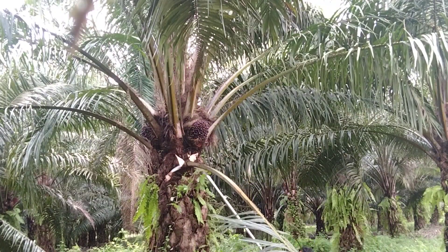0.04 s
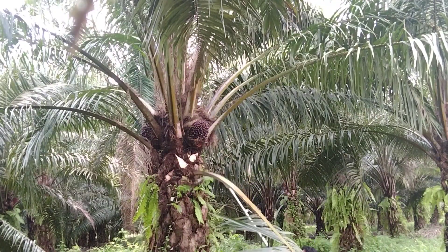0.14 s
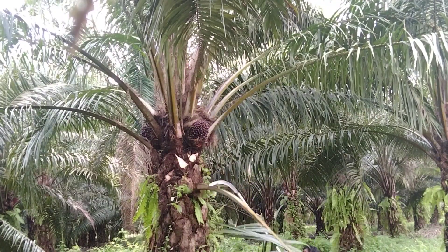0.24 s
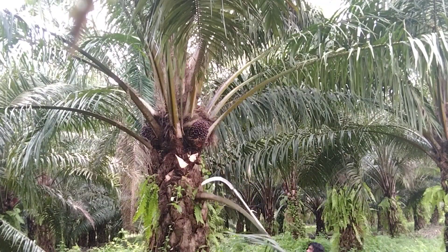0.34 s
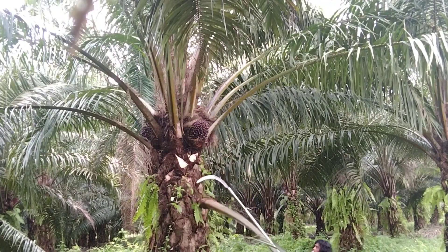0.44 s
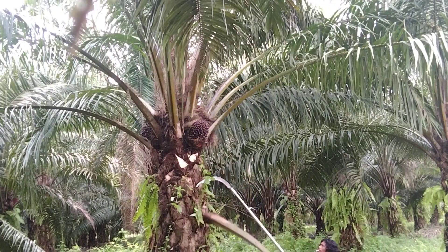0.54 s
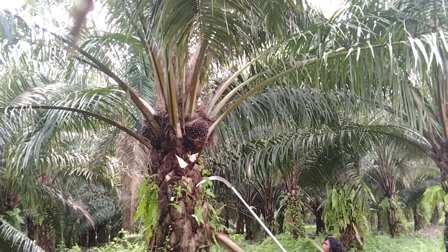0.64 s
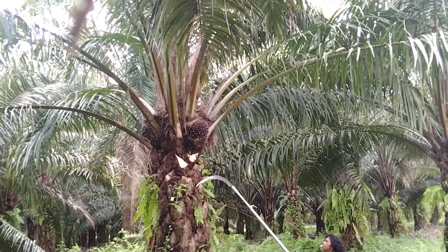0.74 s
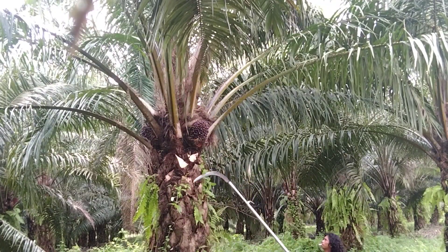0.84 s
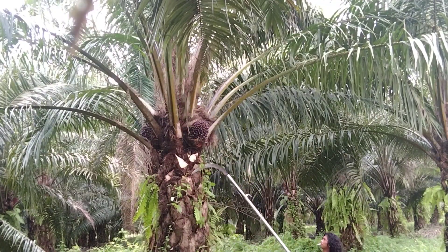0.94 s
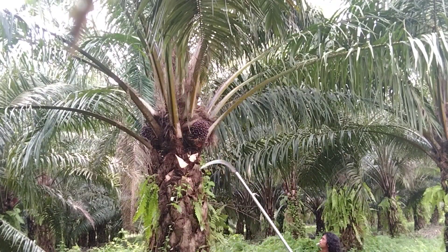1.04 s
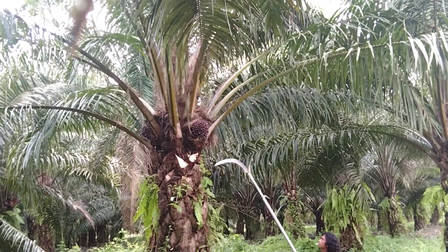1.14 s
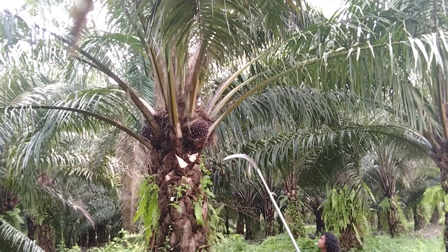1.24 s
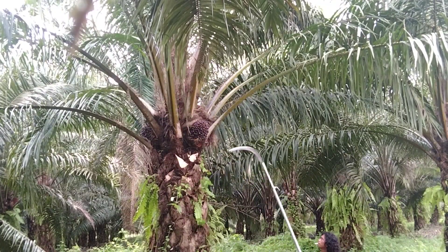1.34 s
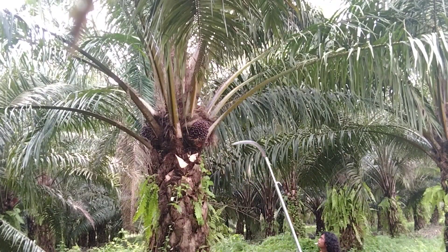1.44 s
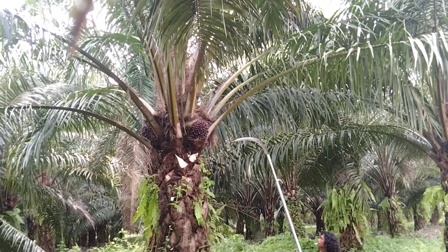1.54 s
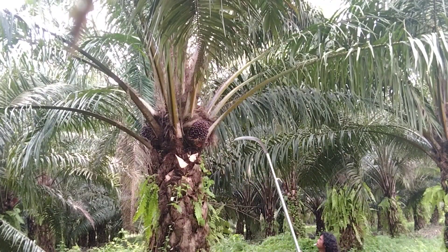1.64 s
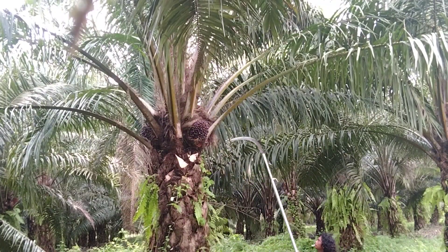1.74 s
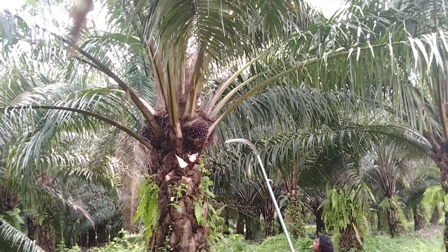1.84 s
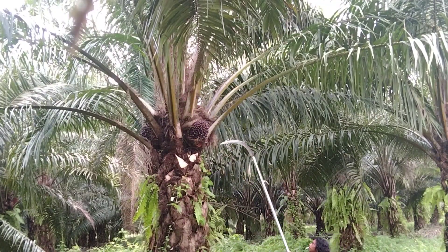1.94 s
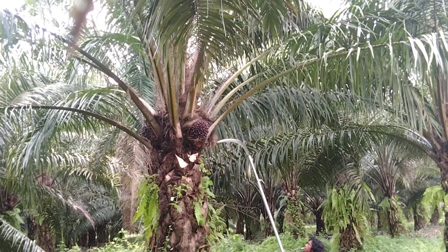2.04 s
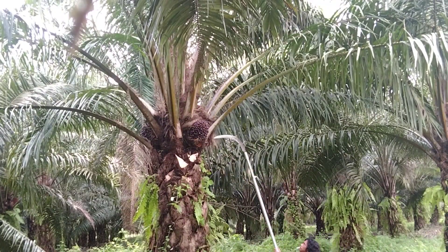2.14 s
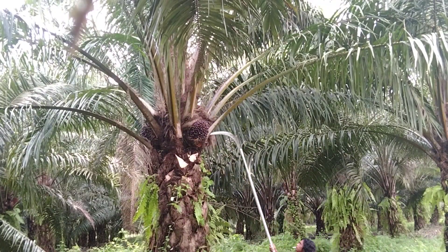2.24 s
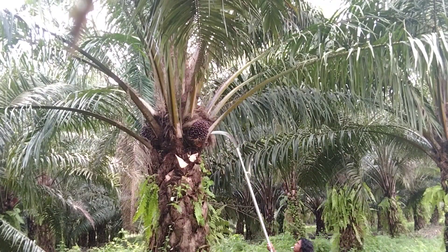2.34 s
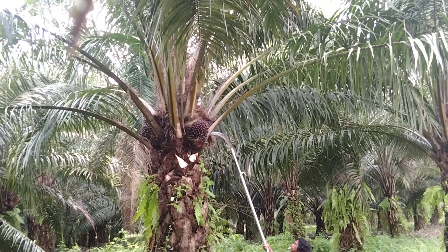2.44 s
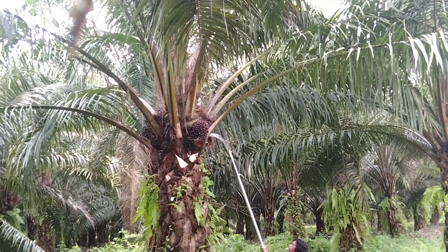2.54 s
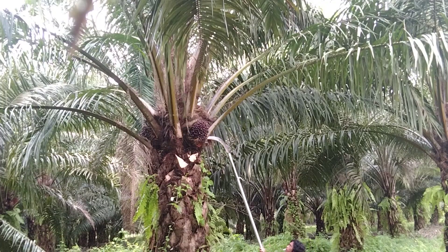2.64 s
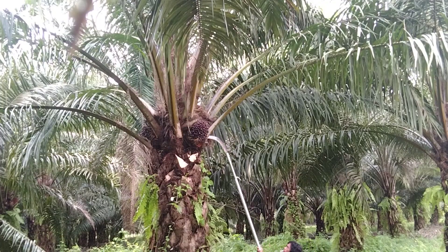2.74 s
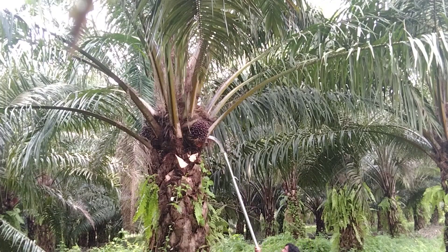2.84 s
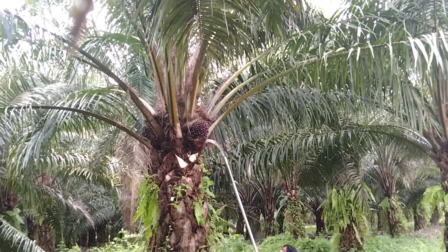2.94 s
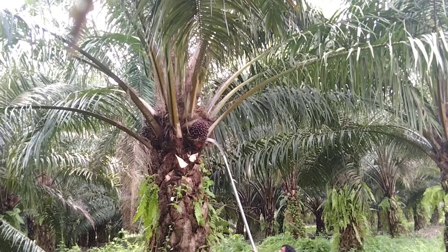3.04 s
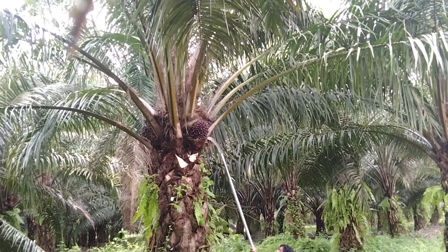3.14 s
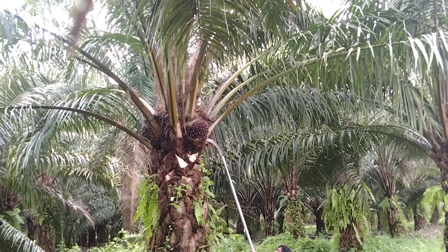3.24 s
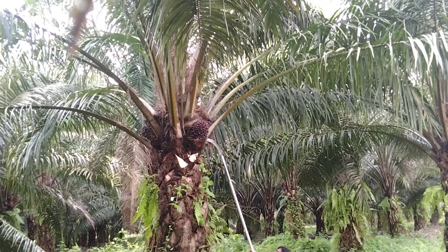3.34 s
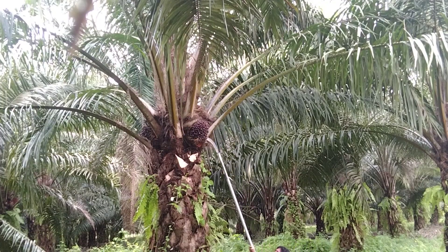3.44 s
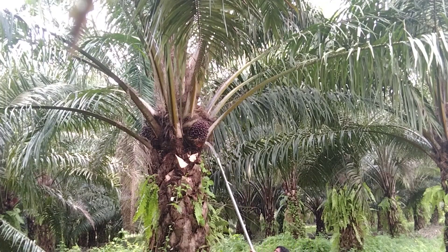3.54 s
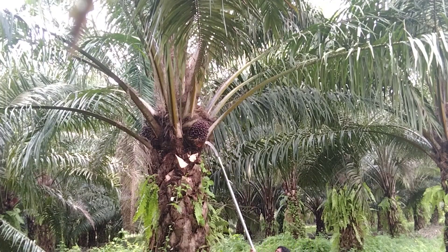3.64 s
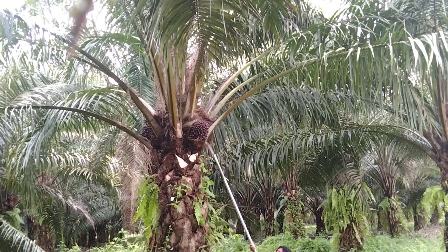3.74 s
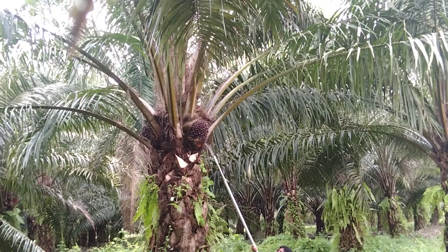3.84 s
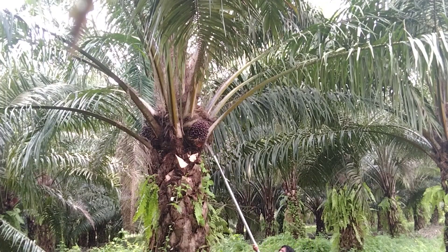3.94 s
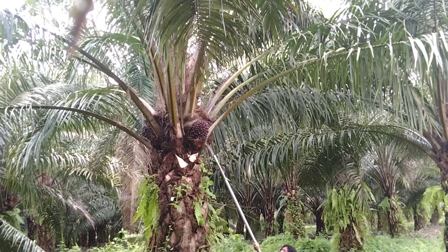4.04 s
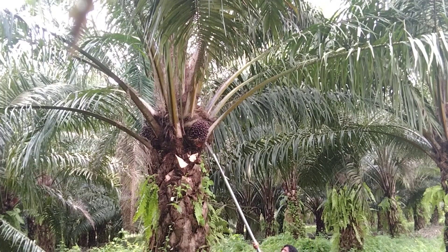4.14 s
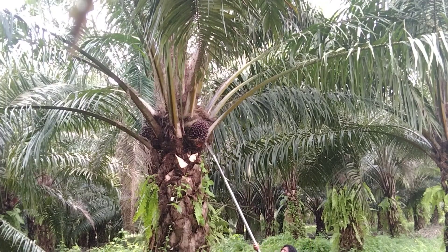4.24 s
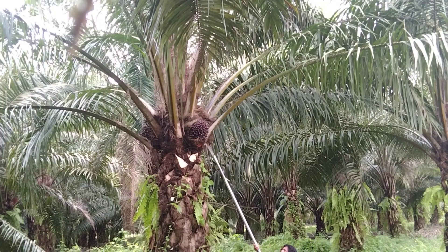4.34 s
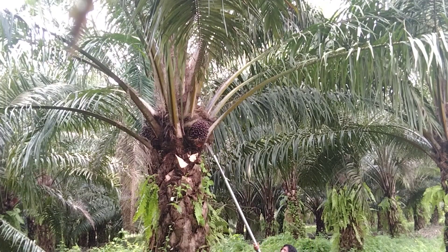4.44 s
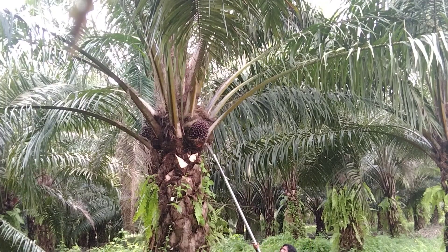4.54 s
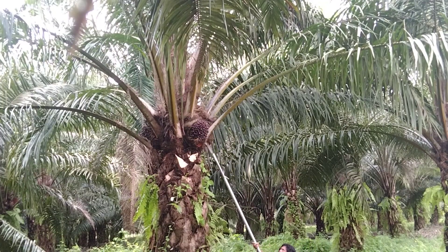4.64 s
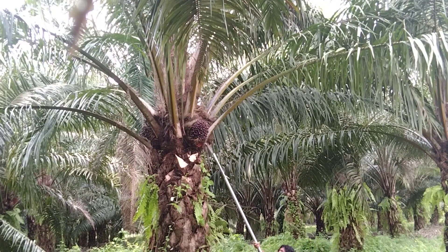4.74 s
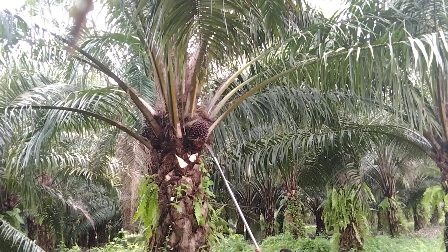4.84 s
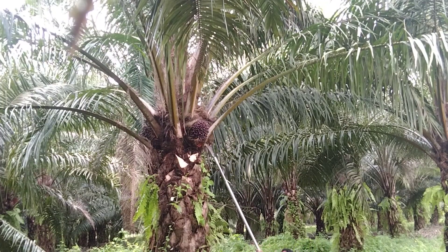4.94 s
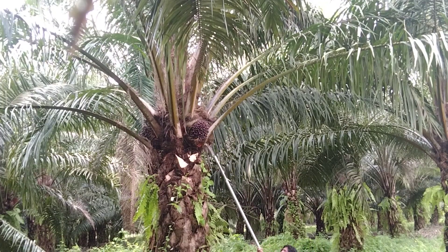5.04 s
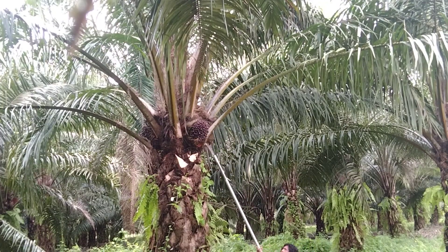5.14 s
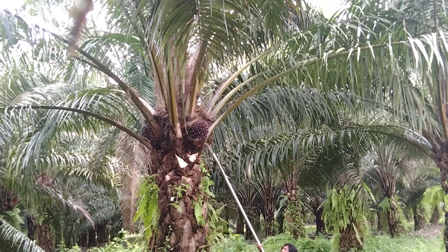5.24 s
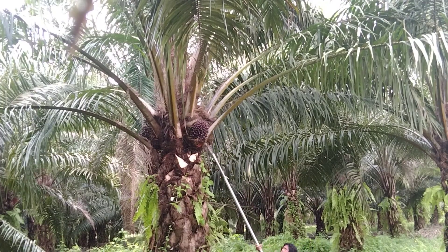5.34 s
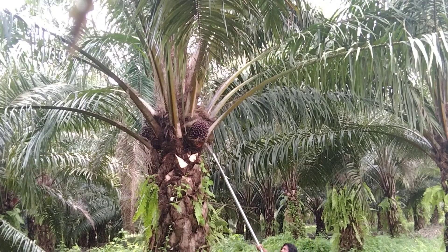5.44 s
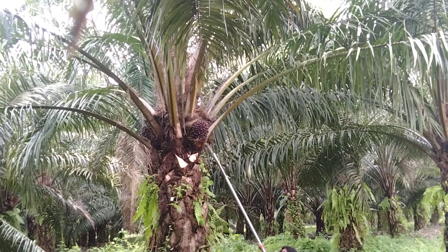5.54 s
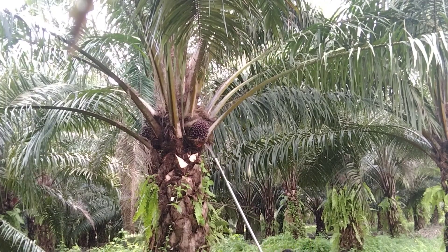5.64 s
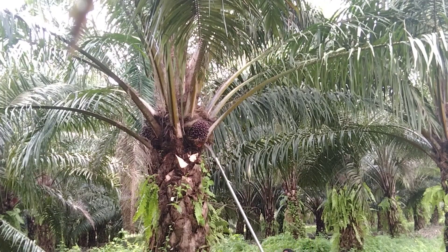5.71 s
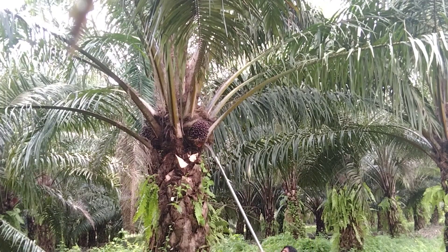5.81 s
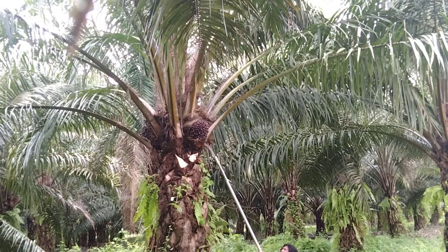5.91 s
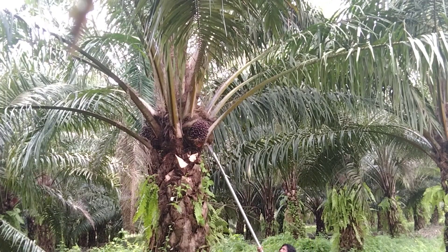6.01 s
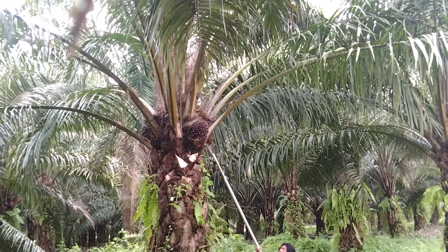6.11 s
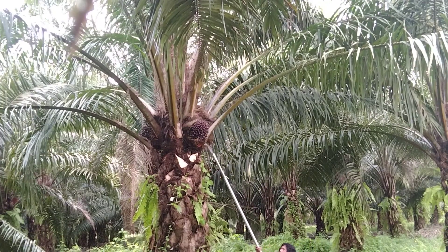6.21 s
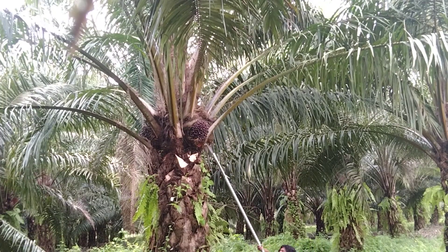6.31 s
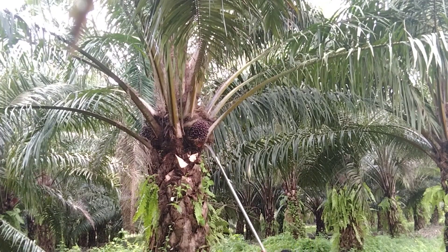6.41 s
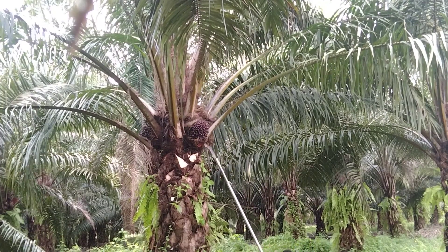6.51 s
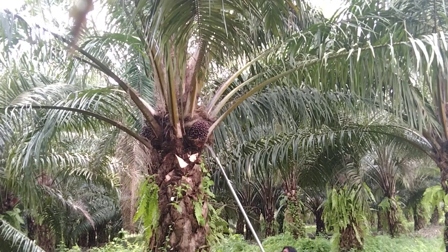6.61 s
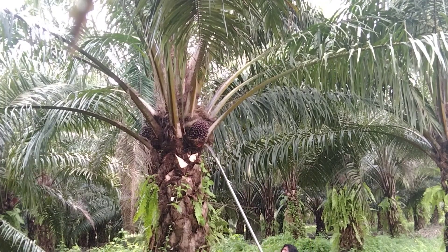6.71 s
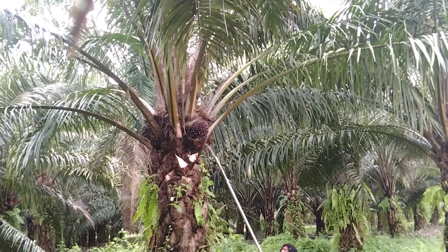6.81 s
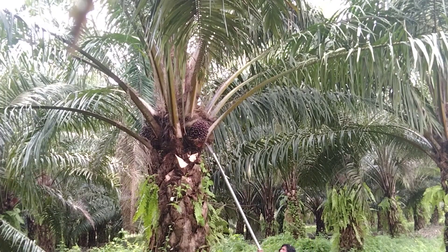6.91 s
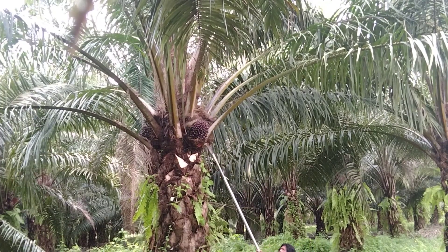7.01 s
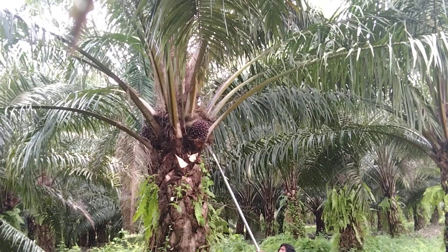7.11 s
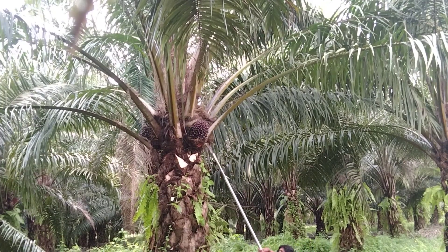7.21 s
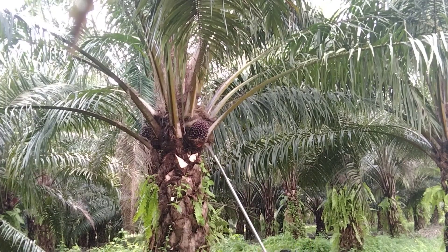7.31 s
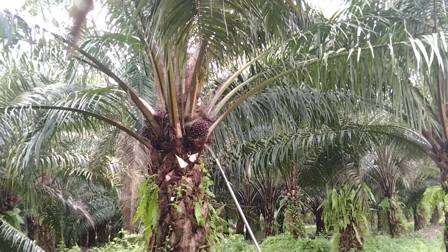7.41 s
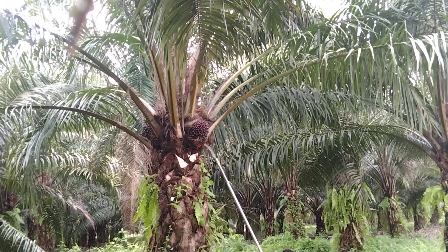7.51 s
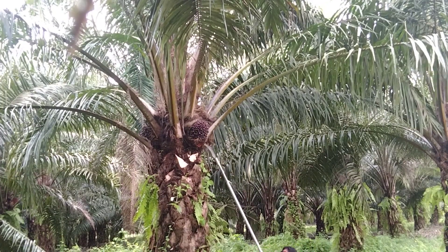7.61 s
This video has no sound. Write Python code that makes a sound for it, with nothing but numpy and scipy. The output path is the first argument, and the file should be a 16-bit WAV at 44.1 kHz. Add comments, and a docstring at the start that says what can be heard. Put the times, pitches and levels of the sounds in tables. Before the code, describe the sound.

A cut palm frond rips free, slides and crashes into undergrowth, then a pole sickle scrapes, clicks and knocks hollowly among woody stalks over faint insects.

```python
"""Palm frond and pole sickle in a grove

A cut palm frond tears loose, slides down the trunk and crashes into the undergrowth in a shower of snaps.
A sickle on a long pole is then worked among the stalks: noise runs scrape, short bursts click on wood and
steel, and sagging tones knock in the hollow pole. The grove scatters these sounds into a short noise tail.
Far-off air, foliage and insects are bands of wavering noise. One microphone channel takes it all in."""
import sys
import numpy as np
from scipy import signal
from scipy.fft import rfft, irfft, next_fast_len
from scipy.io import wavfile
from scipy.ndimage import uniform_filter1d

SR = 44100
rng = np.random.default_rng(int(sys.argv[2]) if len(sys.argv) > 2 else 0)


def materialize(psi):
    """Save the field psi as 16-bit PCM at rate SR to the path in sys.argv[1].

    A 1-D psi becomes a single channel; in a 2-D psi each row is a channel.
    """
    bounded = np.clip(np.atleast_2d(psi).T, -1, 1)
    quanta = np.round(bounded * 32767).astype(np.int16)
    wavfile.write(sys.argv[1], SR, quanta)


N = 338247
TIME = np.arange(N) / SR


def undb(db):
    """Decibels to gain."""
    return 10 ** (np.asarray(db) / 20)


def unit(x):
    """Scale to rms 1."""
    return x / np.sqrt(np.mean(x ** 2))


def colour(x, points):
    """Causal minimum-phase filter through (Hz, dB) points; white noise keeps its power."""
    hz, db = np.transpose(points)
    size = next_fast_len(len(x) + 4096, real=True)
    f = np.maximum(np.fft.rfftfreq(size, 1 / SR), 1)
    # beyond the outer points the response falls with the square of the frequency ratio
    outside = np.maximum(f / hz[-1], 1) * np.maximum(hz[0] / f, 1)
    gain_db = np.interp(np.log(f), np.log(hz), db) - 40 * np.log10(outside)
    gain = unit(undb(gain_db))
    # folding the cepstrum forward in time gives the minimum phase
    cepstrum = irfft(np.log(gain), size)
    cepstrum[1:size // 2] *= 2
    cepstrum[size // 2 + 1:] = 0
    response = np.exp(rfft(cepstrum))
    return irfft(rfft(x, size) * response, size)[:len(x)]


def resonate(x, hz, width_hz):
    """One resonance, gain 1 at its centre."""
    return signal.lfilter(*signal.iirpeak(hz, hz / width_hz, fs=SR), x)


def walk(rate):
    """Random wander in straight ramps, spread near 1, with `rate` new targets a second."""
    k = int(SR / rate)
    steps = np.repeat(rng.standard_normal(N // k + 1), k)
    return 1.3 * uniform_filter1d(steps, k)[:N]


def swell(at, rise, fall):
    """An envelope that climbs to 1 at its moment and dies away exponentially."""
    before = (np.maximum(at - TIME, 0) / rise) ** 1.3
    after = (TIME - at) / fall
    return np.exp(-np.where(TIME < at, before, after).clip(0, 30))


def crackle(rate, spread_db):
    """Tiny snaps of random size at random moments, `rate` a second on average, at rms 1."""
    sizes = undb(spread_db * np.minimum(rng.exponential(size=N), 4))
    return unit((rng.random(N) < rate / SR) * sizes * rng.standard_normal(N))


def flutter(x, depth_db, size=5):
    """Leaflets and fibres of many sizes take turns, so each narrow band comes and goes on its own."""
    bands = signal.stft(x, nperseg=256)[2]
    chance = uniform_filter1d(rng.standard_normal(bands.shape), size, axis=1)
    chance = uniform_filter1d(chance, 2, axis=0)
    gain = unit(undb(depth_db * unit(chance)))
    return signal.istft(bands * gain)[1][:len(x)]


def add(out, at, sound):
    """Mix a short sound in at its time."""
    i = int(at * SR)
    out[i:i + len(sound)] += sound[:N - i]


# Tone of the far air and foliage: (frequency [Hz], relative level per Hz [dB])
FAR_TONE = [(25, -17.5), (80, 1.5), (130, -5.5), (220, -14), (430, -20), (560, -18), (900, -10),
            (1500, -16), (3500, -11), (8000, -20), (11000, -21), (13500, -18), (15200, -17)]
FAR_DB = -71.5
# Steady insects: (frequency [Hz], nominal bandwidth [Hz], level before waver [dB], waver [dB])
INSECTS = [(5075, 98, -87, 3), (6450, 26, -89.5, 5), (7010, 47, -77.5, 3.5), (7520, 260, -75.5, 1.8)]


def background(waver_db=1, flutter_db=3):
    """Far-off air and foliage, and narrow noise bands of insect buzz with a quick ripple."""
    air = flutter(colour(rng.standard_normal(N), FAR_TONE), flutter_db, size=25)
    out = air * undb(FAR_DB + waver_db * walk(4.3))
    for hz, width_hz, db, swing_db in INSECTS:
        buzz = resonate(resonate(rng.standard_normal(N), hz, 2 * width_hz), hz, 2 * width_hz)
        ripple = walk(1.8) / 2 + walk(45)
        out += unit(buzz) * undb(db + swing_db * ripple)
    return out


# Bouts of one trilling insect: (middle [s], peak level [dB], length between 1/e points [s])
TRILL_BOUTS = [(0.1, -77.5, 0.27), (1.98, -86, 0.22), (4.807, -80.5, 0.44), (5.31, -79, 0.3),
               (6.52, -82, 0.33), (6.92, -78.5, 0.27)]
TRILL_HZ = 5030


def trills(width_hz=130):
    """A narrow band of noise makes a thin buzzing tone that swells and stops."""
    buzz = resonate(resonate(rng.standard_normal(N), TRILL_HZ, width_hz), TRILL_HZ, width_hz)
    bouts = sum(undb(db) * np.exp(-np.square(2 * (TIME - at) / length)) for at, db, length in TRILL_BOUTS)
    return unit(buzz) * bouts


# Scatter from the grove: (band centre [Hz], relative level [dB], 60 dB decay time [s])
GROVE_BANDS = [(100, -16.5, .45), (220, -6.5, 0.81), (403, -11.5, 0.6), (710, -10, 0.48),
               (1670, -9.5, 0.48), (3206, -7.5, 0.63), (7140, -3.5, 0.68), (14130, -3, 0.63)]


def echoes(build_s=0.0043):
    """Trunks and leaves return a dense, smooth tail with its own decay in each band."""
    t = TIME[:SR]
    noise = rfft(rng.standard_normal(SR))
    log_hz = np.log(np.arange(SR // 2 + 1) + 1)
    centres = np.log(np.array(GROVE_BANDS)[:, 0])
    tail = 0
    for weights, (hz, db, t60) in zip(np.eye(len(GROVE_BANDS)), GROVE_BANDS):
        band = irfft(noise * np.interp(log_hz, centres, weights), SR)
        shape = np.exp(-np.log(1000) * t / t60) * (1 - np.exp(-t / build_s))
        tail = tail + undb(db) * band * shape / np.linalg.norm(shape)
    return tail


def grove(x, sway_rate=25, count=4):
    """The foliage moves, so the sound drifts between different sets of echo paths."""
    shares = np.array([walk(sway_rate) for _ in range(count)])
    shares /= np.linalg.norm(shares, axis=0)  # constant total power
    return sum(share * signal.fftconvolve(x, echoes())[:N] for share in shares)


# Dull bumps as the weight shifts: (peak time [s], level before the common trim [dB])
BUMPS = [(3.691, -46.5), (5.01, -69.5), (6.2, -57.5), (6.639, -52.5), (7.26, -65)]
# Tone of the bumps: (frequency [Hz], relative level per Hz [dB])
BUMP_TONE = [(25, -39), (55, -16), (90, 1), (125, -4.5), (190, -13), (400, -44.5)]
BUMP_RISE_S, BUMP_FALL_S = 0.044, 0.096


def bumps(trim_db=-4):
    """Shifting weight gives soft low thuds: swells of dark noise."""
    force = sum(undb(db + trim_db) * swell(at, BUMP_RISE_S, BUMP_FALL_S) for at, db in BUMPS)
    return force * colour(rng.standard_normal(N), BUMP_TONE)


# Stalks settling and brushing: (peak time [s], pitch [Hz], nominal amplitude [dB], width [s])
TAPS = [(.045, 728, -62, 0.016), (.107, 840, -63, 0.0077), (.192, 500, -54, 0.011), (.733, 610, -39, 0.011),
        (1.992, 1187, -63, 0.012), (2.122, 1480, -57.5, 0.0043), (2.16, 967, -55, 0.0069),
        (2.328, 902, -56.5, 0.0043), (2.522, 1273, -67, 0.008), (2.7, 1360, -59, .005),
        (7.305, 713, -59, .015)]
# Tone of the leaflets, also in the frond: (frequency [Hz], relative level per Hz [dB])
LEAF_TONE = [(200, -13.5), (330, -5.5), (550, 1), (900, 1), (1500, 2.5), (2200, -0.5), (3000, -5),
             (4200, -7.5), (5500, -34.5)]
TAP_OVERTONE = 2.2  # multiple of the pitch


def taps(width_hz=130, overtone_db=-8, brush_db=-9):
    """A soft touch stirs only the low resonances of a stalk."""
    out, t = np.zeros(N), TIME[:SR // 12] - .035
    for at, hz, db, width in TAPS:
        noise = rng.standard_normal(len(t))
        low, high = (unit(resonate(resonate(noise, f, 2 * width_hz), f, 2 * width_hz))
                     for f in (hz, TAP_OVERTONE * hz))
        brush = colour(noise, LEAF_TONE)
        tap = low + undb(overtone_db) * high + undb(brush_db) * brush
        tap = tap * np.exp(-(t / width) ** 2 / 2)
        rms = tap[abs(t) < width].std()
        add(out, at + t[0], undb(db) * tap / (2 * rms))
    return out


# The stalk tears off, bumps the trunk twice, hits the ground: (peak time [s], level before trim [dB])
THUDS = [(.25, -47.5), (.635, -57), (.785, -50.5), (1.15, -39.5)]
# Tone of the heavy stalk: (frequency [Hz], relative level per Hz [dB])
THUD_TONE = [(25, -24.5), (50, -29.5), (90, -6), (160, -2.5), (240, 0), (400, -9)]
# Hiss of leaflet tips, also in rip, scrapes and clicks: (frequency [Hz], relative level per Hz [dB])
HISS_TONE = [(3500, -25.5), (4600, -4), (6200, -2), (7300, 1), (8400, -2.5), (11300, -10.5), (13500, -9.5),
             (15200, -4)]
THUD_RISE_S, THUD_FALL_S = 0.017, 0.096
# the frond slides down the trunk, lands, and its leaflets come to rest (levels before the trims)
SLIDE_S, SLIDE_DB, SLIDE_DB_PER_S, SLIDE_ATTACK_S = 0.23, -46, -3.5, .04  # attack ends at SLIDE_S
LANDS_S, CRASH_DB, CRASH_RISE_S, CRASH_FALL_S = 1.18, -38.5, 0.052, 0.1
SETTLE_DB_PER_S = -21.5
# the hiss of the tips grows more slowly than the rustle: dB at the slide level, dB per dB of rustle
TIPS_DB, TIPS_SLOPE = -51, 0.71


def frond(leaf_db=-1.5, hiss_db=-2, thud_db=-1, drag_db=-19, patchy_db=-1.5, flutter_db=1.5,
          lone_db=-4, thinning_s=0.31):
    """Leaflets brush and snap in a dense shower while the heavy stalk thuds down."""
    sliding = np.clip((TIME - SLIDE_S) / SLIDE_ATTACK_S + 1, 0, 1)
    landed_s = np.maximum(TIME - LANDS_S, 0)
    slide_db = SLIDE_DB + SLIDE_DB_PER_S * (TIME - SLIDE_S) + SETTLE_DB_PER_S * landed_s
    crash = undb(CRASH_DB) * swell(LANDS_S, CRASH_RISE_S, CRASH_FALL_S)
    rustle = sliding * undb(slide_db) + crash
    hiss = undb(TIPS_DB) * (rustle / undb(SLIDE_DB)) ** TIPS_SLOPE
    thud = undb(drag_db) * rustle
    thud = thud + sum(undb(db) * swell(at, THUD_RISE_S, THUD_FALL_S) for at, db in THUDS)
    # after the landing the lone ticks stand out more against the dense shower
    settled = np.clip(landed_s / thinning_s, .3, 1)
    shower = crackle(rate=7000, spread_db=-1)
    ticks = crackle(rate=230, spread_db=-2.0)
    snaps = shower + settled * undb(lone_db) * ticks
    leaves = flutter(colour(snaps, LEAF_TONE), flutter_db) * rustle * undb(leaf_db + patchy_db * walk(60))
    tips = colour(snaps + 0.38 * rng.standard_normal(N), HISS_TONE) * hiss * undb(hiss_db)
    stalk = colour(rng.standard_normal(N), THUD_TONE) * thud * undb(thud_db)
    return leaves + tips + stalk


# The stalk fibres rip through: (peak time [s], burst level [dB], width [s], resonance [Hz])
RIP = (.2355, -25.5, .0058, 1380)
# Tone of rubbing fibres, also in the scrapes: (frequency [Hz], relative level per Hz [dB])
FIBRE_TONE = [(120, -24.5), (330, 2), (600, 0.5), (1000, 1), (1350, 2), (1650, 0), (2000, -2), (2700, -8),
              (3300, -8), (4300, -14), (6000, -38.5)]


def rip(width_hz=260, crunch_db=1, hiss_db=-9, splinter_db=-36.0, lag_s=0.013, rise_s=0.023, fall_s=0.015):
    """The last fibres part in one dense burst that rings the stalk; bright splinters peak just after it."""
    at, db, width, hz = RIP
    snaps = crackle(rate=55000, spread_db=2.5)  # rate above SR: a snap on every sample
    force = np.exp(-((TIME - at) / width) ** 2 / 2)
    burst = unit(resonate(snaps, hz, width_hz))
    burst = burst + undb(crunch_db) * colour(snaps, FIBRE_TONE) + undb(hiss_db) * colour(snaps, HISS_TONE)
    burst_rms = np.sqrt(np.average(burst ** 2, weights=force))
    fibres = crackle(rate=6400, spread_db=-1.0)
    splinters = colour(fibres, FIBRE_TONE) + colour(fibres, HISS_TONE)
    splinters = splinters * undb(splinter_db) * swell(at + lag_s, rise_s, fall_s)
    return undb(db) * force * burst / burst_rms + splinters


# Fibre runs, from faint leaf brushes to sickle shoves: (peak time [s], level [dB], rise plus fall [s])
SCRAPES = [(.06, -71, .12), (0.317, -38.5, 0.026), (2.18, -67.5, .11), (2.385, -68, 0.072),
           (2.757, -58, 0.055), (2.954, -55, 0.074), (3.099, -46.5, 0.051), (3.201, -57, .025),
           (3.261, -56.5, 0.035), (3.38, -46, 0.058), (3.613, -58, 0.024), (3.702, -45.5, 0.066),
           (3.968, -48, 0.034), (4.015, -42.5, 0.02), (4.37, -54, 0.051), (4.454, -47.5, 0.029),
           (4.818, -58, .022), (5.018, -39, 0.032), (5.395, -42, 0.03), (5.789, -35.5, 0.029),
           (6.144, -46.5, 0.027), (6.188, -41, 0.018), (6.615, -40.5, 0.048), (7.043, -52, 0.041),
           (7.092, -53, 0.13), (7.529, -43, 0.077)]
SCRAPE_RISE_SHARE = 0.44  # of the length; the rest is the fall
# a light brush is bright, a hard shove woody: treble dB at the reference level, that level, dB per dB
SCRAPE_TREBLE_DB, SCRAPE_REFERENCE_DB, SCRAPE_TREBLE_SLOPE = -7.5, -46.5, -0.46
# only a hard shove stirs the low wood: its upper edge in Hz, bass dB per dB under the reference
SCRAPE_BASS_HZ, SCRAPE_BASS_SLOPE = 700, .5


def scrapes(body_db=0, treble_db=-1, flutter_db=2.5, coarse_db=-7):
    """Fibres catch and let go in quick runs of small snaps, with a few coarser ones among them."""
    bass, body, treble = np.zeros((3, N))
    for at, db, length in SCRAPES:
        force = undb(db) * swell(at, SCRAPE_RISE_SHARE * length, (1 - SCRAPE_RISE_SHARE) * length)
        effort_db = db - SCRAPE_REFERENCE_DB
        bass += force * undb(SCRAPE_BASS_SLOPE * min(effort_db, 0))
        body += force
        treble += force * undb(SCRAPE_TREBLE_DB + SCRAPE_TREBLE_SLOPE * effort_db)
    fine = crackle(rate=7700, spread_db=2.0)
    coarse = crackle(rate=220, spread_db=-1.0)
    snaps = fine + undb(coarse_db) * coarse
    wood = flutter(colour(snaps, FIBRE_TONE), flutter_db, size=9)
    low = signal.sosfiltfilt(signal.butter(2, SCRAPE_BASS_HZ, fs=SR, output="sos"), wood)
    rubbing = (low * bass + (wood - low) * body) * undb(body_db)
    return rubbing + colour(snaps, HISS_TONE) * treble * undb(treble_db)


# Hollow knocks: (peak time [s], pitch at the peak before wobble [Hz], amplitude before modes [dB],
# rise plus fall [s])
KNOCKS = [(3.105, 351, -38, 0.025), (3.39, 360, -34.5, 0.025), (3.707, 340.5, -31.5, 0.031),
          (4.021, 372.4, -39.5, 0.018), (4.465, 364, -44.5, 0.015), (5.027, 358.8, -24.5, 0.0088),
          (5.805, 373, -25, 0.013), (6.626, 361.2, -24, 0.015), (6.681, 330.7, -34, 0.013),
          (7.547, 363.5, -28.5, .008), (7.599, 384, -23.5, 0.011)]
# Modes of the pole: (multiple of the pitch [ratio], relative level [dB])
POLE_MODES = [(0.999, -3), (2.029, -16.5)]
KNOCK_RISE_SHARE = 0.35  # of the length; the rest is the fall


def knocks(knock_db=0, sag=0.0829, sag_s=0.0043, rough=0.053, wobble=0.041):
    """The pole rings hollow under a shove; the pitch sags as the push lets go."""
    out, t = np.zeros(N), TIME[:SR // 5] - .05
    for at, hz, db, length in KNOCKS:
        rise, fall = KNOCK_RISE_SHARE * length, (1 - KNOCK_RISE_SHARE) * length
        grip = unit(uniform_filter1d(rng.standard_normal((2, len(t))), SR // 400))
        pitch = hz * (1 - sag * np.tanh(t / sag_s) + wobble * grip[0])
        phase = 2 * np.pi * np.cumsum(pitch) / SR
        shape = np.where(t < 0, np.exp(-(t / rise) ** 2 / 2), np.exp(-abs(t) / fall))
        shape = shape * (1 + rough * grip[1])
        ring = sum(undb(mode_db) * np.sin(k * phase) for k, mode_db in POLE_MODES)
        add(out, at + t[0], undb(db + knock_db) * shape * ring)
    return out


# Blade, pole and falling frond hit stalks: (time [s], stalk resonance [Hz], crack level [dB],
# treble relative to the crack [dB])
CLICKS = [(.585, 1540, -41.5, -9), (.609, 1810, -43.5, -5), (.877, 1940, -47.5, -1.5),
          (1.033, 1400, -45, -24), (1.098, 1310, -41, -8.5), (1.145, 1000, -45.5, 10.5),
          (2.72, 1420, -50.5, -9.5), (2.911, 1600, -55, -5), (3.012, 2020, -51.5, -6.5),
          (3.049, 1960, -52, -3), (3.089, 1290, -41, -15), (3.181, 1440, -46, -12), (3.293, 675, -50.5, -2),
          (3.37, 1460, -44, -10), (3.616, 2480, -40.5, -5), (3.69, 1760, -40, -5), (3.96, 1510, -47.5, -23),
          (3.97, 650, -41, -12), (4.007, 1450, -44.5, -7), (4.249, 2250, -77, 19), (4.336, 1470, -49, -10),
          (4.349, 1780, -48, -5.5), (4.374, 880, -50, -15), (4.445, 940, -45, -4.5),
          (4.459, 1520, -42, -16), (4.788, 1200, -49.5, -18), (4.91, 1170, -52.5, -10.5),
          (5.009, 1810, -36.5, -7), (5.331, 653, -56, -16.5), (5.372, 1400, -49, -21),
          (5.3831, 1270, -35, -10.5), (5.3971, 1870, -36.5, -12), (5.757, 2010, -38.5, -12.5),
          (5.775, 2030, -39, -5), (6.124, 1230, -40, -6.5), (6.174, 1220, -41.5, -17),
          (6.272, 1360, -49, -19), (6.532, 1270, -53, -40), (6.585, 1380, -46.5, -6.5),
          (6.626, 594, -35, -13), (6.982, 1070, -51.5, -30), (7.014, 1240, -44.5, -5.5),
          (7.042, 1170, -46, -6), (7.084, 1110, -39, -7.5), (7.428, 1860, -55.5, -16),
          (7.502, 1220, -49, -12), (7.518, 2250, -48, 1), (7.567, 1940, -47, -13)]
# Tone of the woody crack: (frequency [Hz], relative level per Hz [dB])
CLICK_TONE = [(150, -21.5), (400, 1), (700, 4.5), (1000, 4), (1400, 5.5), (1700, 3), (2050, 6),
              (2700, -3.5), (3800, -10.5), (5500, -26)]
BLADE_HZ, BLADE_WIDTH_HZ = 3280, 130
# the harder the contact, the shorter: decay at the reference level, halved for each step up in dB
CLICK_DECAY_S, CLICK_REFERENCE_DB, CLICK_HALVING_DB = 0.0049, -43, 15.5
# once the steel is struck squarely and rings out
CLANG_S, CLANG_DB = 3.616, -37.5


def clicks(body_db=0, treble_db=0, ring_db=-12, snap=0.7, attack_s=0.00024, stalk_width_hz=260, stalk_db=-2):
    """A hard contact: a woody crack that rings the stalk, a bright snap and a brief ring of the steel blade."""
    out, t = np.zeros(N), TIME[:SR // 20]
    head = int(.008 * SR)  # each part's level holds over these first 8 ms
    onset = 1 - np.exp(-t / attack_s)
    blade = onset * np.exp(-np.pi * BLADE_WIDTH_HZ * t) * np.sin(2 * np.pi * BLADE_HZ * t)
    for at, hz, db, bright_db in CLICKS:
        noise = rng.standard_normal(len(t)) * onset
        decay = CLICK_DECAY_S * 2 ** ((CLICK_REFERENCE_DB - db) / CLICK_HALVING_DB)
        crack = unit(colour(noise * np.exp(-t / decay), CLICK_TONE))
        woody = crack + undb(stalk_db) * unit(resonate(crack, hz, stalk_width_hz))
        bright = colour(noise * np.exp(-t / (snap * decay)), HISS_TONE)
        parts = [(woody, body_db), (bright, bright_db + treble_db), (blade, ring_db)]
        add(out, at, sum(part * undb(db + part_db) / part[:head].std() for part, part_db in parts))
    add(out, CLANG_S, blade * undb(CLANG_DB) / blade[:head].std())
    return out


def scene(frond_wet_db=-9, rip_wet_db=-5, knock_wet_db=-9):
    """Frond, rip, wood and pole sound into the grove; bumps, background and trills stay unscattered."""
    leaves, tear, wood, hollow = frond(), rip(), scrapes() + clicks() + taps(), knocks()
    sent = wood + undb(frond_wet_db) * leaves + undb(rip_wet_db) * tear + undb(knock_wet_db) * hollow
    scatter = grove(sent)
    return (leaves + tear + wood + hollow + scatter + bumps() + background() + trills())[None]


def suppress(x, threshold_db=-110, floor_db=-12, release_s=0.025, steepness=0.95):
    """Noise suppressor: turns down each narrow band whose power per Hz is low; opens fast, closes slowly."""
    bands = signal.stft(x, SR, nperseg=512, scaling="psd")[2]
    power = uniform_filter1d(np.abs(bands) ** 2, size=3, axis=-1).clip(0)
    keep = np.exp(-256 / SR / release_s)  # one step is 256 samples
    power = np.maximum(power, signal.lfilter([1 - keep], [1, -keep], power))
    excess = (power / undb(threshold_db) ** 2) ** steepness
    gain = np.maximum(excess / (1 + excess), undb(floor_db))
    return signal.istft(bands * gain, SR, nperseg=512, scaling="psd")[1][:, :N]


def record(dry, low_cut_hz=45, top_hz=15600):
    """The recorder behind the microphone thins the bass, quietens the faintest sounds and cuts the top."""
    thinned = signal.sosfilt(signal.butter(2, low_cut_hz, "high", fs=SR, output="sos"), dry)
    quietened = suppress(thinned)
    return signal.sosfilt(signal.ellip(10, .2, 70, top_hz, fs=SR, output="sos"), quietened)


dry = scene()
out = record(dry)
materialize(out)
```